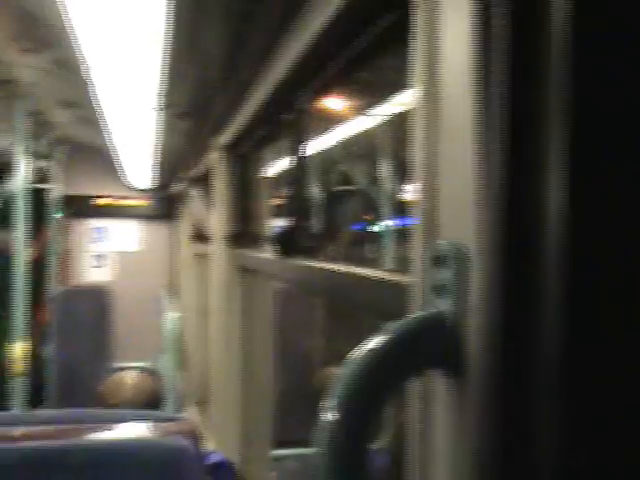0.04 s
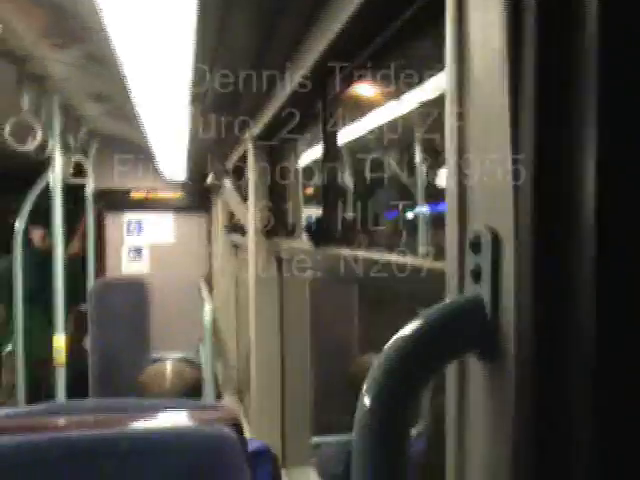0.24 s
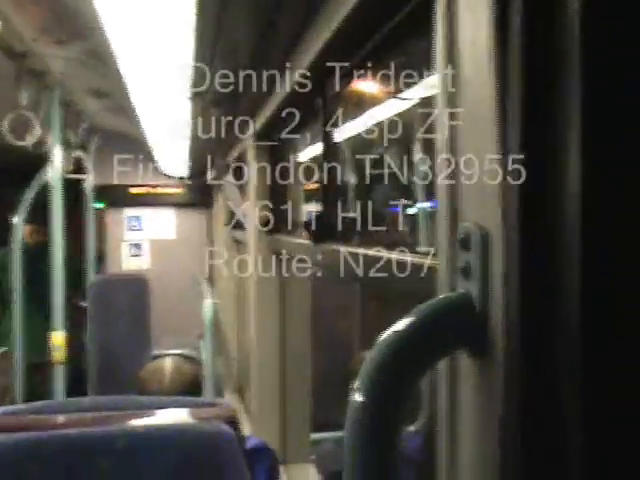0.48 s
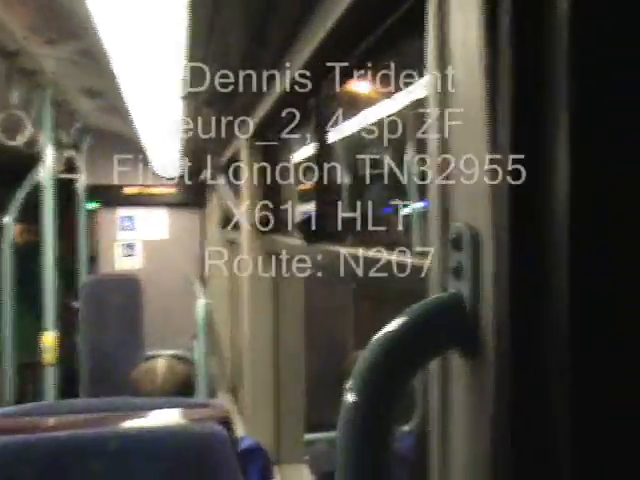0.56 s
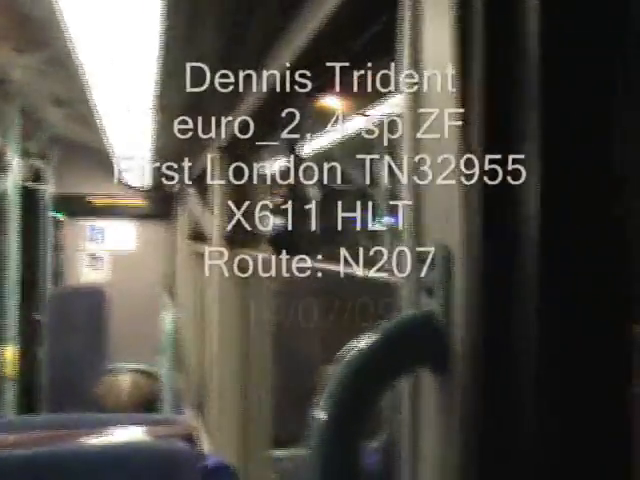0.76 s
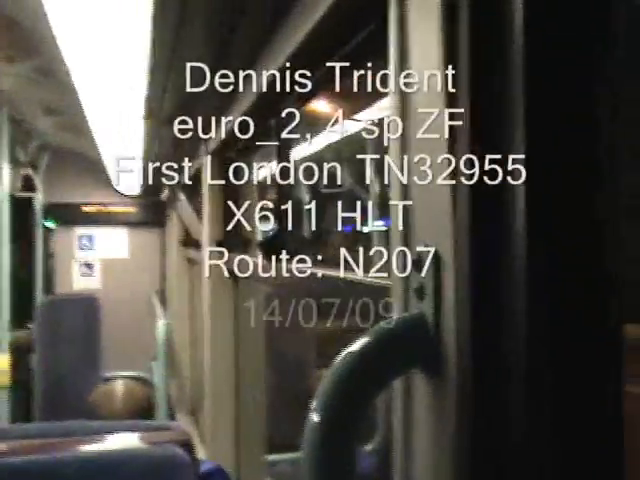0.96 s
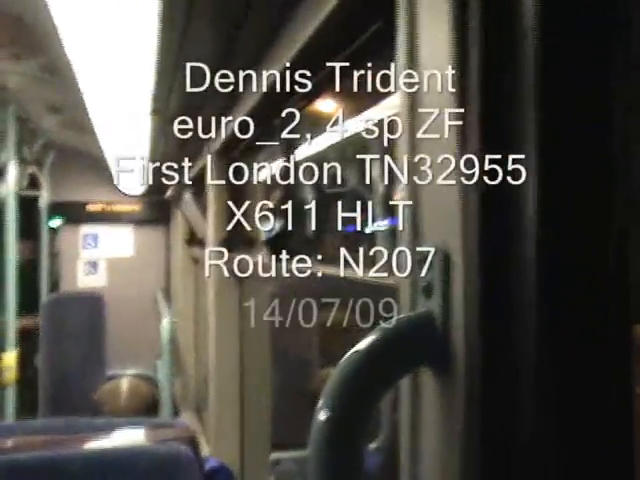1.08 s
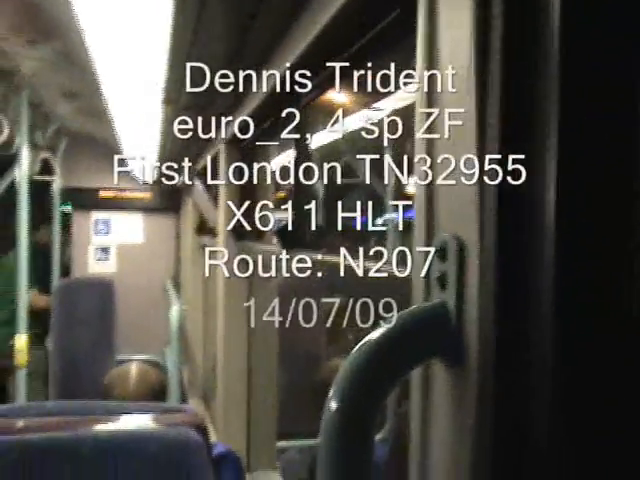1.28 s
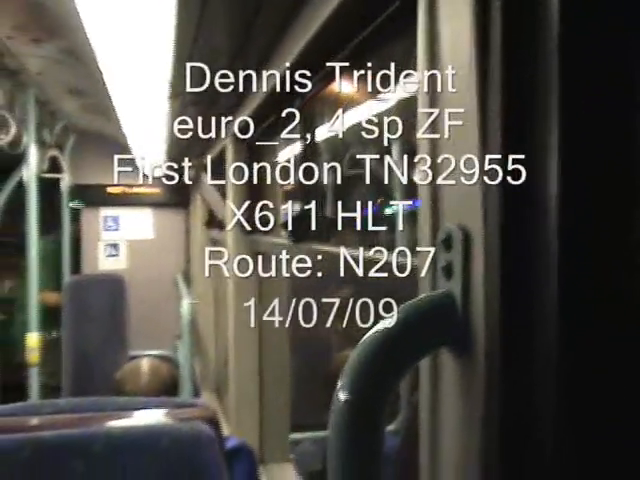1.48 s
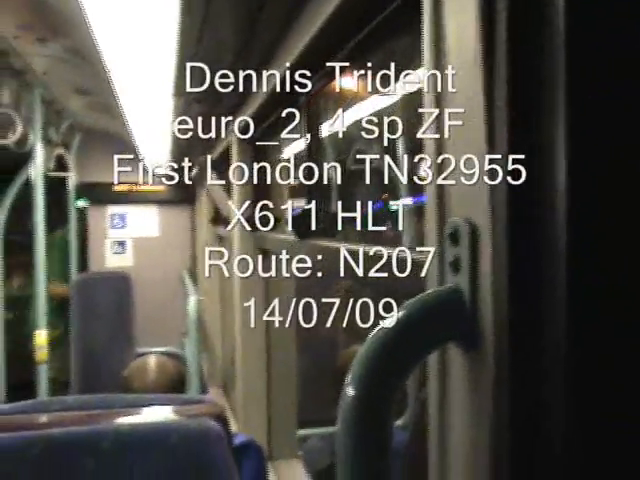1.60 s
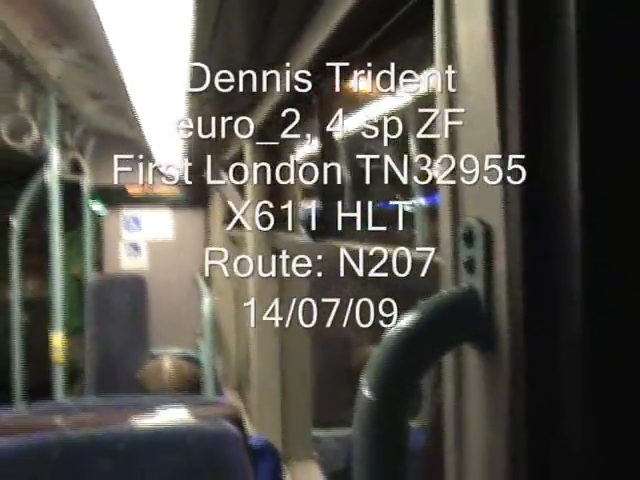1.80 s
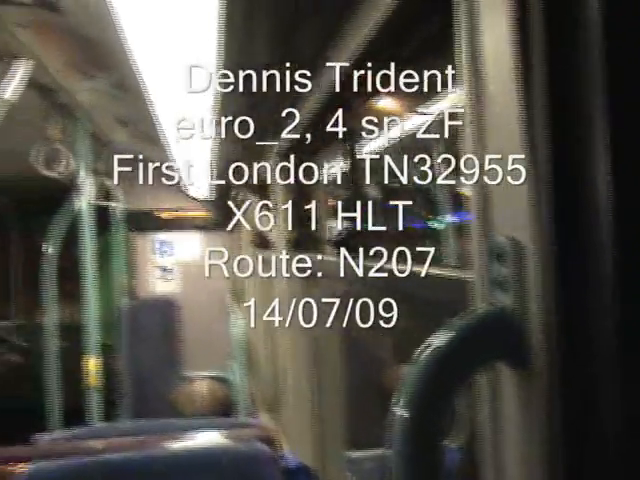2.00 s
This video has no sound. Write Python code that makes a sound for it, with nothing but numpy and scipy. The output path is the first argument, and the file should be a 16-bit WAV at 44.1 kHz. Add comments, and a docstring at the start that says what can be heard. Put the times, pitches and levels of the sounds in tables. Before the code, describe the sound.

A diesel bus engine idles with a low throb, heard from inside the cabin under a wavering air hiss. A dull puff of air comes at about 0.2 seconds, then a few light ticks. From 1.3 seconds the engine speeds up, its drone rising and growing louder as a loose panel rattles. At 1.8 seconds a sharp clack and air spit end the hiss, and the revs keep climbing.

```python
"""Diesel bus pulling away

Heard from inside, the engine idles at 30 firings a second, then speeds up. Its harmonics force the
cabin into a throb, a drone rises through two body resonances, and a loose panel rattles with the
firings. Air hisses throughout, with a dull puff early on and a sharp clack and spit as the revs climb."""
import sys
import numpy as np
from scipy import signal
from scipy.fft import rfft, irfft
from scipy.io import wavfile

SR = 44100
rng = np.random.default_rng(int(sys.argv[2]) if len(sys.argv) > 2 else 0)


def wav_record(signal):
    """Record a signal, one row per channel, as 16-bit PCM in the file named by sys.argv[1]."""
    frames = np.transpose(np.atleast_2d(signal))
    bounded = np.clip(frames, -1, 1)
    # unit amplitude maps onto the largest positive 16-bit level
    quanta = np.round(bounded * 32767).astype(np.int16)
    wavfile.write(sys.argv[1], SR, quanta)


N = 90272
TIME = np.arange(N) / SR


# Response of the cabin to an engine harmonic: (frequency [Hz], level [dB])
CABIN_RESPONSE = [(31, -35), (36, -33), (43, -29.5), (63, -35.5), (74, -47), (93, -40), (120, -38),
                  (150, -45.5), (180, -44.5), (210, -39.5), (240, -45.5), (270, -37.5), (300, -43),
                  (326, -42.5), (365, -50.5), (420, -42), (450, -37), (490, -56), (700, -49)]

def throb(firing_hz):
    """Forced vibration: harmonics of the firing rate sweep through the cabin's response."""
    out = 0
    for order in range(1, 17):
        hz = order * firing_hz
        unsteadiness = np.sqrt(order / 4)
        harmonic = partial(hz, waver=0.24 * unsteadiness, jitter_rad=0.32 * unsteadiness)
        out = out + from_db(at_hz(CABIN_RESPONSE, hz)) * harmonic
    return out


# Drone as it crosses the body resonances: (time [s], level [dB])
DRONE_LEVEL = [(0.14, -33.5), (0.8, -33.5), (1.05, -30), (1.3, -32.5), (1.41, -26.5), (1.47, -23),
               (1.57, -20.5), (1.715, -21.5), (1.745, -30), (1.82, -29), (1.88, -27.5), (1.945, -19.5),
               (2.04, -27.5)]

def drone(firing_hz):
    """Rotational tone: an engine-driven part, perhaps a fan or pump, sounds a note and its octave."""
    hz = 4.5 * firing_hz
    octave = from_db(at_hz(CABIN_RESPONSE, 2 * hz) - 7.5) * partial(2 * hz, waver=0.046, jitter_rad=0.069)
    return from_db(in_time(DRONE_LEVEL)) * partial(hz, waver=0.046, jitter_rad=0.027) + octave


# Upper drone: (time [s], level [dB])
UPPER_DRONE_LEVEL = [(0.14, -34.5), (0.55, -31.5), (1.1, -32.5), (1.43, -28.5), (1.56, -33), (1.7, -30),
                     (1.83, -27.5), (1.93, -33.5), (2.04, -35)]

def upper_drone(firing_hz, mode_hz=311.8, bandwidth_hz=34):
    """Resonance: one harmonic after another dominates as it rises through a cabin mode."""
    harmonics = [order * firing_hz for order in range(6, 12)]
    weights = [1 / (1 + (2 * (hz - mode_hz) / bandwidth_hz) ** 2) for hz in harmonics]
    note = sum(w * partial(hz, waver=0.28, jitter_rad=0.19) for hz, w in zip(harmonics, weights))
    return from_db(in_time(UPPER_DRONE_LEVEL)) * note / np.linalg.norm(weights, axis=0)


# Low cabin modes: (frequency [Hz], bandwidth [Hz], relative gain [dB])
CABIN_MODES = [(84.4, 27, -5.5), (149, 28.4, -2.5), (222, 43.4, -3), (315, 48, -5), (438.8, 25.3, -2.5)]
# Combustion and road noise: (frequency [Hz], relative spectral density [dB])
ROAR_SPECTRUM = [(60, 3.5), (200, 3), (450, -3), (540, -1), (800, -2.5), (1200, -4.5), (2100, -10.5),
                 (2800, -16), (4000, -20), (7000, -25), (15000, -52)]

def rumble(firing_hz, revs):
    """Amplitude modulation: noise swells with each firing, as a modal boom and a broadband roar."""
    beat = np.cos(2 * np.pi * np.cumsum(firing_hz) / SR)
    boom = unit_rms(resonate(cabin_noise() * (1 + 0.26 * beat), CABIN_MODES))
    roar = cabin_noise(ROAR_SPECTRUM) * (1 + 0.16 * beat) * from_db(-0.5 * drift(60))
    low_cut = signal.butter(2, 57.3, "high", fs=SR, output="sos")
    return signal.sosfilt(low_cut, from_db(-29.5 + revs) * boom + from_db(-31) * roar)


def shudder(revs, mode_hz=93, bandwidth_hz=48):
    """Random excitation: a low body resonance shakes harder as the engine pulls."""
    mode = [(mode_hz, bandwidth_hz, 0)]
    shaking = unit_rms(resonate(resonate(cabin_noise(), mode), mode))
    return from_db(-44.5 + 18.5 * revs) * shaking


# Impacts of the loose panel: (time [s], relative level [dB], extra level in the high modes [dB])
PANEL_KNOCKS = [(0.334, -30, 0), (0.447, -37, 1), (0.459, -31, 2), (0.479, -36, -1), (0.493, -34, 1),
                (0.513, -35, 0), (0.528, -31, -1.5), (0.563, -32, -2), (0.693, -37.5, 4.5), (1.195, -30, 2),
                (1.222, -34, -6), (1.294, -29, -1.5), (1.358, -36.5, 5), (1.392, -34, 3),
                (1.425, -28, -0.5), (1.456, -31.5, 3.5), (1.476, -29, -0.5), (1.489, -30, 2),
                (1.52, -27, 0), (1.54, -32.5, -2), (1.548, -30.5, 0), (1.568, -34, 0), (1.579, -33.5, 3),
                (1.598, -28, 0), (1.612, -28.5, 1.5), (1.64, -30, 0), (1.668, -39, 4), (1.691, -28.5, 0),
                (1.699, -30, -3.5), (1.718, -28.5, 1.5), (1.745, -28.5, 2), (1.772, -33.5, 3.5),
                (1.796, -31, 0), (1.862, -31, 2), (1.884, -28.5, 0), (1.908, -39, 5), (1.931, -31, -3.5),
                (1.954, -36, 4), (1.964, -30, -1), (1.975, -31, -1.5), (1.986, -33.5, 3.5),
                (2.01, -31, -3.5), (2.036, -41, 3)]
# Panel modes: (frequency [Hz], bandwidth [Hz], relative gain [dB])
PANEL_MODES = [(1030, 170, -5), (1750, 65, 9.5), (2195, 230, 0), (2766, 140, 1.5), (3064, 49, 2),
               (3460, 380, -4), (4453, 220, 0), (4650, 175, 2.5), (5600, 250, -4.5), (6150, 100, -3),
               (6480, 125, -3), (6800, 110, -8), (7280, 106, -4.5), (9550, 200, -10.5), (10750, 250, -13.5),
               (13100, 1400, -14.5)]

def rattle(firing_hz, high_modes_hz=4000, contact_cutoff_hz=8600):
    """Impact excitation: ticks, chatter and a pulsing buzz ring the modes of a loose panel."""
    times, level_db, high_db = np.transpose(PANEL_KNOCKS)
    # Each knock has a brief chatter and a short cabin tail.
    envelopes = np.array([burst(t, 0.00016, 0.0025) + from_db(-8.5) * burst(t, 0.0023, 0.011)
                          for t in times])
    # The buzz sets in above idle and pulses twice per firing.
    buzz = from_db(-43) * np.interp(firing_hz, [30.5, 33.7], [0, 1])
    buzz *= 1 + 0.54 * np.cos(2 * np.pi * np.cumsum(2 * firing_hz) / SR)
    contact = cabin_noise()
    tick_db = rng.normal(17, 1.5, (len(times), len(PANEL_MODES)))
    ringing = 0
    for k, mode in enumerate(PANEL_MODES):
        strength = from_db(level_db + high_db * (mode[0] > high_modes_hz))
        ticks = np.zeros(N)
        ticks[(times * SR).astype(int)] = strength * from_db(tick_db[:, k])
        chatter = contact * np.hypot(strength @ envelopes, buzz)
        ringing = ringing + (-1) ** k * resonate(ticks + chatter, [mode])
    # A soft contact barely excites the highest modes.
    softness = signal.butter(2, contact_cutoff_hz, fs=SR, output="sos")
    steady_rms = np.std(resonate(signal.sosfilt(softness, contact), PANEL_MODES))
    return from_db(-1.5) * pan(-4.5) * signal.sosfilt(softness, ringing) / steady_rms


# Modes of the clack: (frequency [Hz], bandwidth [Hz], relative gain [dB])
CLACK_MODES = [(810, 210, 1), (1870, 250, 1.5), (2500, 370, -4.5), (8760, 450, -11.5), (12300, 730, -26)]

def clack():
    """Damped vibration: one hard clack, perhaps a valve, dies quickly with the spit of air."""
    ringing = unit_rms(resonate(cabin_noise(), CLACK_MODES))
    return from_db(-25.5) * burst(1.808, attack_s=0.0035, decay_s=0.013) * ringing


# Puffs: (time [s], attack [s], decay [s], level [dB], low edge [Hz], high edge [Hz])
AIR_PUFFS = [(0.22, 0.025, 0.088, -28, 960, 2300), (0.24, 0.015, 0.05, -38.5, 3050, 4000),
             (0.548, 0.023, 0.017, -31, 472, 2030), (1.805, 0.0042, 0.012, -27.5, 790, 12600),
             (1.822, 0.018, 0.024, -34.5, 600, 13960)]

def puffs(tilt_hz=2760):
    """Transient turbulence: each puff of air is a fluttering, decaying band of noise."""
    out = 0
    for start, attack, decay, db, low, high in AIR_PUFFS:
        band = signal.butter(2, [low, high], "band", fs=SR, output="sos")
        air = signal.sosfilt(band, cabin_noise())
        air = signal.lfilter(*signal.butter(1, tilt_hz, fs=SR), air)
        flutter = from_db(-2.5 * drift(180))
        out = out + from_db(db) * burst(start, attack, decay) * unit_rms(air * flutter)
    return out


# Wavering air hiss: (frequency [Hz], relative spectral density [dB])
HISS_SPECTRUM = [(1500, 11.5), (3500, 6), (5000, 6), (6000, 6.5), (7500, 7), (9000, 1.5), (10000, -2),
                 (11500, -5.5), (13000, -10.5), (16000, -13)]
# Its envelope: (time [s], level [dB])
HISS_ENVELOPE = [(0.16, -38.5), (0.35, -38.5), (0.5, -46.5), (0.57, -37.5), (0.66, -40), (0.85, -37),
                 (1.0, -37), (1.05, -39.5), (1.1, -35), (1.19, -41.5), (1.27, -37.5), (1.43, -42.5),
                 (1.6, -43.5), (1.8, -40.5), (1.91, -67), (2.04, -57)]
# Thin whistles: (start [s], end [s], frequency [Hz], bandwidth [Hz], level [dB])
AIR_WHISTLES = [(0.506, 0.92, 6980, 260, -48), (0.76, 0.98, 8800, 600, -66), (0.66, 1, 11200, 990, -60.5),
                (1.54, 1.7, 9900, 300, -57.5)]

def air_hiss(whistle_ramp_s=0.036):
    """Flow noise: moving air gives a broadband hiss, with passing narrowband whistles."""
    out = from_db(in_time(HISS_ENVELOPE)) * cabin_noise(HISS_SPECTRUM)
    for start, end, hz, width, db in AIR_WHISTLES:
        gate = np.clip(np.minimum(TIME - start, end - TIME) / whistle_ramp_s, 0, 1)
        out += from_db(db) * gate * unit_rms(resonate(cabin_noise(), [(hz, width, 0)]))
    return out


# Recorder hiss: (frequency [Hz], relative spectral density [dB]), and its overall level
RECORDER_HISS, RECORDER_HISS_DB = [(5000, -9), (9000, -1), (12500, -1), (15000, 0), (16000, -11)], -61

def recorder_hiss():
    """Noise floor: the recorder adds a faint, steady, high hiss."""
    return from_db(RECORDER_HISS_DB) * cabin_noise(RECORDER_HISS)


# Likeness of left and right: (frequency [Hz], coherence [ratio])
COHERENCE = [(60, 1), (180, 1), (320, 0.74), (550, 0.68), (1000, 0.79), (4000, 0.86), (15000, 0.79)]

def cabin_noise(spectrum=None):
    """Partial coherence: shared and opposed noise add to a stereo field, white unless shaped."""
    hz = np.arange(N // 2 + 1) * SR / N
    mid, side = rfft(rng.standard_normal((2, N)))
    coherence = at_hz(COHERENCE, hz)
    field = np.sqrt(1 + coherence) * mid + np.sqrt(1 - coherence) * side * [[1], [-1]]
    colour = from_db(at_hz(spectrum, hz)) if spectrum else 1
    return unit_rms(irfft(field * stereo_gains(hz) * colour, N))


# Balance of the cabin sound: (frequency [Hz], left minus right level [dB])
LEVEL_DIFFERENCE = [(30, 2), (60, 2), (140, 3), (290, 8.5), (450, 5.5), (740, 5.5), (1220, 2), (2000, -0.5),
                    (3500, -2.5), (6000, 0.5), (15000, 0)]
# Lead of the left side: (frequency [Hz], phase [rad])
PHASE_DIFFERENCE = [(60, 0.47), (160, 0.96), (320, 0.89), (450, 1.03), (780, -0.58), (2800, -0.16),
                    (4000, 0.83), (15000, -0.74)]

def stereo_gains(hz):
    """Localisation: differences of level and phase between left and right place the sound."""
    phase = at_hz(PHASE_DIFFERENCE, hz) * np.array([[0.5], [-0.5]])
    return pan(at_hz(LEVEL_DIFFERENCE, hz)) * np.exp(1j * phase)


def partial(hz, waver, jitter_rad):
    """Random modulation: an engine partial wavers in amplitude and jitters in phase."""
    phase = 2 * np.pi * (np.cumsum(hz) / SR + rng.random()) + jitter_rad * drift(7.1)
    carrier = np.sqrt(2) * np.real(np.exp(1j * phase) * stereo_gains(hz))
    return carrier * (1 + waver * drift(10.9))


def resonate(force, modes):
    """Modal superposition: two-pole resonators add with alternating signs."""
    out = 0
    for k, (hz, width, db) in enumerate(modes):
        radius = np.exp(-np.pi * width / SR)
        feedback = [1, -2 * radius * np.cos(2 * np.pi * hz / SR), radius ** 2]
        gain = (-1) ** k * from_db(db) * (1 - radius ** 2) / 2
        out = out + gain * signal.lfilter([1, 0, -1], feedback, force + 1e-18)
    return out


def burst(start_s, attack_s, decay_s):
    """Exponential decay after a linear rise."""
    age = TIME - start_s
    return np.clip(age / attack_s, 0, 1) * np.exp(-np.maximum(age - attack_s, 0) / decay_s)


def drift(corner_hz):
    """Random fluctuation: low-passed noise of unit rms."""
    pole = np.exp(-2 * np.pi * corner_hz / SR)
    smoothed = signal.lfilter([1], [1, -2 * pole, pole ** 2], rng.standard_normal(2 * N))
    return unit_rms(smoothed[N:])


def pan(db):
    """Left and right gains for a level difference."""
    return from_db(np.array([[1], [-1]]) * db / 2)


def from_db(db):
    """Amplitude ratio of a level in decibels."""
    return 10 ** (np.asarray(db) / 20)


def unit_rms(x):
    """Normalisation to unit power."""
    return x / np.sqrt(np.mean(x ** 2) + 1e-20)


def in_time(rows):
    """Linear interpolation at every sample."""
    return np.interp(TIME, *np.transpose(rows))


def at_hz(rows, hz):
    """Interpolation on a log-frequency axis."""
    frequencies, values = np.transpose(rows)
    return np.interp(np.log(np.maximum(hz, 1)), np.log(frequencies), values)


# Engine speed: (time [s], firing rate [Hz])
FIRING_RATE = [(0.14, 30.6), (0.4, 30.3), (0.8, 29.9), (1.1, 29.6), (1.31, 30.8), (1.43, 33.7),
               (1.56, 33.8), (1.72, 35.3), (1.76, 39.7), (1.82, 42.3), (1.9, 46.6), (2.04, 48.8)]

def scene():
    """Superposition: engine-driven vibrations add to the clack, the air and the recorder hiss."""
    firing_hz = in_time(FIRING_RATE)
    revs = (firing_hz - firing_hz.min()) / np.ptp(firing_hz)  # 0 at the slowest, 1 at the fastest
    tones = throb(firing_hz) + drone(firing_hz) + upper_drone(firing_hz)
    body = rumble(firing_hz, revs) + shudder(revs) + rattle(firing_hz)
    return tones + body + clack() + air_hiss() + recorder_hiss() + puffs()


def record(dry, start_s=0.135, fade_s=0.023, cutoff_hz=15800):
    """Band limiting: a steep low-pass cuts the top, after a quick fade-in from silence."""
    fade_in = np.clip((TIME - start_s) / fade_s, 0, 1)
    low_pass = signal.ellip(12, 0.1, 80, cutoff_hz, fs=SR, output="sos")
    return signal.sosfilt(low_pass, dry * fade_in)


dry = scene()
out = record(dry)
wav_record(out)
```